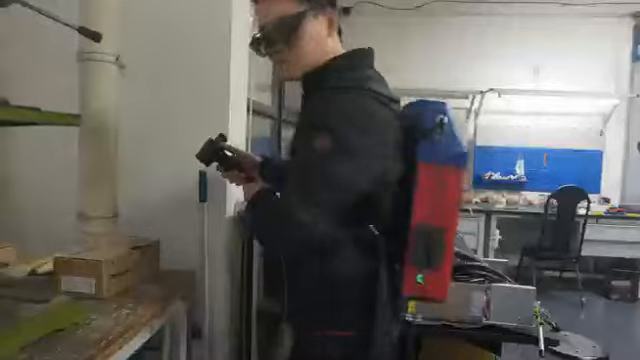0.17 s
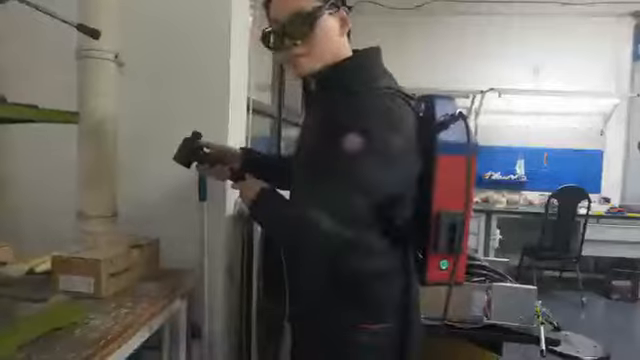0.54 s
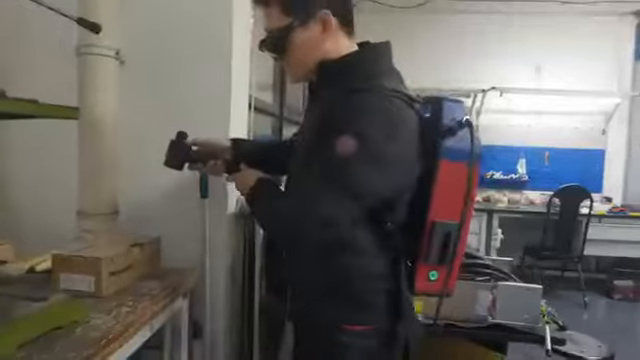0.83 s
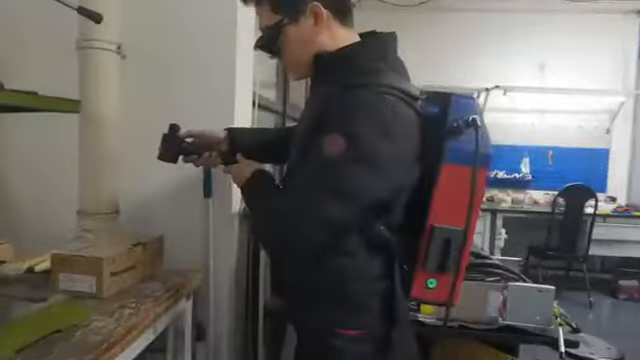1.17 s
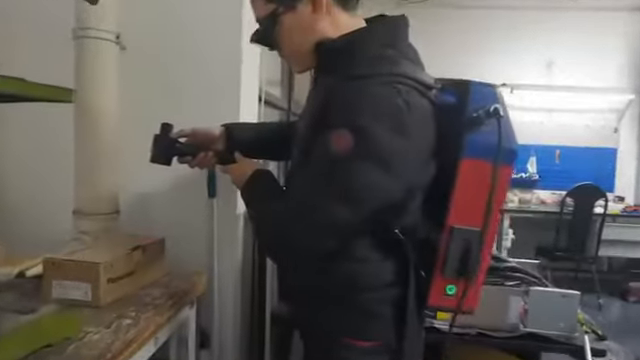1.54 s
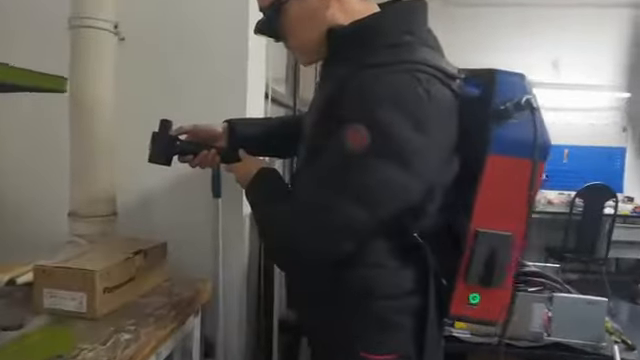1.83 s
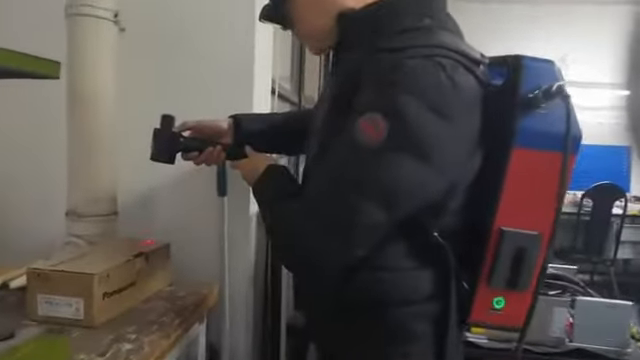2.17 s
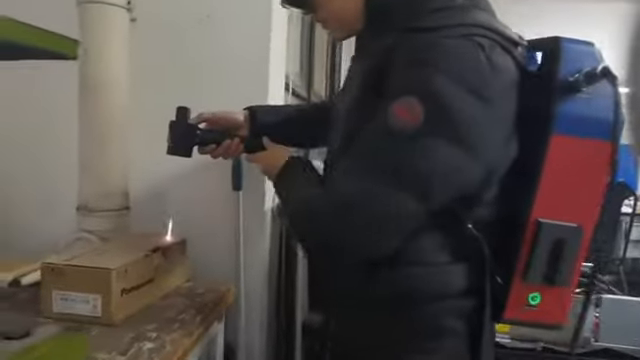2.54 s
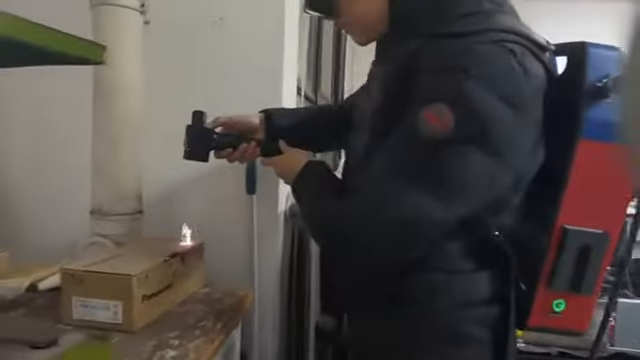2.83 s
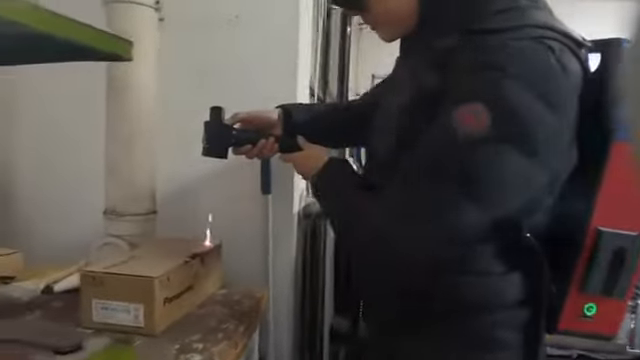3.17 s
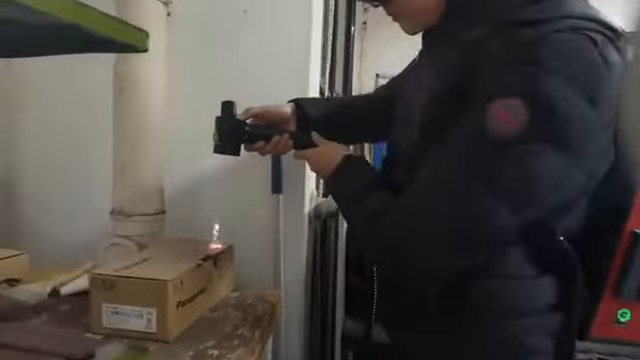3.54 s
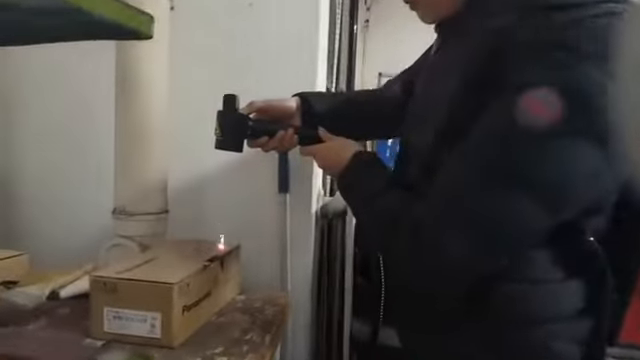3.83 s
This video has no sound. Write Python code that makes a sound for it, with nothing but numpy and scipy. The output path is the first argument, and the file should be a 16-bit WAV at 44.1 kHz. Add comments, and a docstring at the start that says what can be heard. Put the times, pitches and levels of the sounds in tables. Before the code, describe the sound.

In a workshop, cooling fans whine and hum softly while a jacket faintly rustles. Then the main sound cuts in nearby: a laser scorching cardboard in bursts of buzzing, crackling sizzle, loudest at the end.

```python
"""A backpack laser cleaner runs in a workshop. At about 0.23 s the sound comes in: cooling fans whine
and beat against each other, air throbs in the housing, and the operator's padded jacket rustles faintly.
From 2.35 s the beam sweeps back and forth over a cardboard box and burns it in thousands of tiny pops.
They blend into a harsh, buzzing sizzle that flares and fades as the hand moves."""
import sys
import numpy as np
from scipy import signal
from scipy.fft import rfft, irfft
from scipy.io import wavfile

SR = 44100
rng = np.random.default_rng(int(sys.argv[2]) if len(sys.argv) > 2 else 0)


def transcribe(signal):
    """Save signal, clipped to [-1, 1], as a 16-bit WAV file at the path in sys.argv[1]."""
    frames = np.atleast_2d(signal).T
    limited = np.clip(frames, -1, 1)
    pcm = np.round(limited * 32767).astype(np.int16)
    wavfile.write(sys.argv[1], SR, pcm)


N = 176400
T = np.arange(N) / SR
HZ = np.maximum(np.fft.rfftfreq(N, 1 / SR), 1)
BEAM_ON_S = 2.345

# how strongly the housing drones: (time [s], level [dB])
DRONE_LEVEL = [(.3, -42.5), (.6, -45), (.9, -48.5), (1.03, -38.5), (1.35, -39.5), (1.7, -44), (2.15, -43),
               (2.3, -43.5), (2.9, -51), (3.35, -43.5), (3.6, -50), (4, -52)]
# how much of the cardboard's grain the next sweep meets again: (time [s], share [0-1])
REPEAT_SHARE = [(2.6, .55), (3.05, .3), (3.35, .4), (3.95, .25)]


def from_db(db):
    """Turn decibels into a factor to multiply by."""
    return 10 ** (np.asarray(db) / 20)


def rms_one(x):
    """Scale a signal so that its average strength (rms) is 1."""
    return x / np.sqrt(np.mean(x ** 2) + 1e-20)


def over_time(table):
    """Join (time, value) points into one value per sample."""
    return np.interp(T, *np.transpose(table))


def over_hz(table):
    """Join (frequency, value) points into one value per frequency in HZ."""
    hz, value = np.transpose(table)
    return np.interp(np.log(HZ), np.log(hz), value)


def filtered(x, gain):
    """Turn each frequency up or down by its own gain."""
    return irfft(rfft(x) * gain, N)


def drift(hz, size=8192):
    """A random wobble of strength about 1, mostly slower than hz."""
    rates = np.fft.rfftfreq(size, T[-1] / size)
    slow = irfft(rfft(rng.standard_normal(size)) * (rates > 1) / (1 + (rates / hz) ** 2))
    return np.interp(T, np.linspace(0, T[-1], size), rms_one(slow))


def stereo_noise(gain):
    """Filtered noise, alike on both sides in the bass and unrelated in the treble."""
    # how alike left and right are: (frequency [Hz], likeness [0-1])
    likeness = [(60, .97), (300, .87), (600, .65), (1200, .05)]
    alike = over_hz(likeness)
    middle = filtered(rng.standard_normal(N), gain * np.sqrt(1 + alike))
    side = filtered(rng.standard_normal(N), gain * np.sqrt(1 - alike))
    return rms_one(np.array([middle + side, middle - side]))


def tone(hz, wander_hz=.96, waver_db=1.7):
    """A pure tone whose pitch and loudness wobble a little."""
    phase = 2 * np.pi * (np.cumsum(hz + wander_hz * drift(4.7)) / SR + rng.random())
    return rms_one(np.sin(phase) * from_db(waver_db * drift(11)))


def shop_rumble():
    """The workshop rumbles low in the background."""
    # tone colour of the rumble: (frequency [Hz], relative level [dB])
    colour = [(15, -18), (30, -20), (41, 10), (55, -5), (75, -19), (150, -3), (500, -83)]
    # loudness of the rumble: (time [s], level [dB])
    level = [(.3, -78), (1.4, -82), (1.9, -60.5), (2.8, -69), (3.3, -49), (4, -59)]
    return stereo_noise(from_db(over_hz(colour))) * from_db(over_time(level))


def jacket():
    """The padded jacket rustles softly as the operator turns."""
    # tone colour of the cloth: (frequency [Hz], relative level [dB])
    colour = [(500, -20), (2000, 24), (7000, -2), (15000, 5)]
    # loudness of the rustle: (time [s], level [dB])
    level = [(.25, -66), (.5, -55.5), (.68, -63), (1.15, -61.5), (1.45, -68), (2.2, -69)]
    return stereo_noise(from_db(over_hz(colour))) * from_db(over_time(level) + 2 * drift(10))


def cooling_air(housing_hz=276.2, width_hz=32, waver_db=.5):
    """Cooling air rushes through the housing and makes it throb around its own pitch."""
    # tone colour of the rush: (frequency [Hz], relative level [dB])
    colour = [(70, -5), (130, -2), (200, 1), (330, 3), (420, -5), (580, 1), (720, -9), (1000, -7.5),
              (1500, -13.5), (2300, -14), (2900, -20), (4000, -17.5), (5800, -20), (8000, -35.5),
              (15000, -43.5)]
    # loudness of the rush: (time [s], level [dB])
    level = [(.3, -47.5), (1.6, -45.5), (2.4, -46.5), (4, -45)]
    resonance = 1 / (1 + ((HZ - housing_hz ** 2 / HZ) / width_hz) ** 2)
    throb = stereo_noise(resonance) * from_db(over_time(DRONE_LEVEL) - 1.5)
    rush = stereo_noise(from_db(over_hz(colour))) * from_db(over_time(level) + waver_db * drift(8.2))
    return throb + rush


def housing_drone():
    """Low tones in the housing lie so close in pitch that together they pulse, or beat."""
    # tones of the drone: (pitch [Hz], level relative to the drone [dB])
    tones = [(271.5, -14), (279.5, -5.5), (297, -11), (311, -13)]
    return sum(tone(hz) * from_db(db) for hz, db in tones) * from_db(over_time(DRONE_LEVEL))


def housing_swells(width_s=.017):
    """The housing's drone swells softly for short moments."""
    # the swells: (time [s], peak level [dB], pitch [Hz])
    swells = [(0.352, -32, 300.4), (0.828, -35, 276), (0.981, -25.5, 270.9), (1.166, -30.5, 275),
              (1.21, -26.5, 280.7), (1.86, -29.5, 280.7), (2.031, -33, 272), (2.112, -26, 272),
              (2.17, -29, 277.5), (3.193, -33, 271.4), (3.427, -37, 276.4), (3.848, -39.5, 275)]
    return sum(from_db(db) * np.exp(-((T - s) / width_s) ** 2) * np.sin(2 * np.pi * (hz * T + rng.random()))
               for s, db, hz in swells)


def fan_tone(hz, roughness=.16):
    """One fan's tone, roughened by swirling air that differs on each side."""
    flutter = np.array([drift(28) + 1j * drift(28) for side in range(2)])
    # complex numbers let the flutter shake both loudness and phase
    return rms_one(np.real(signal.hilbert(tone(hz)) * (1 + roughness * flutter)))


def fans():
    """Three fans at nearly the same speed beat against each other; one overtone briefly sings out."""
    # the low, middle and high fan: (pitch [Hz])
    pitches = [543.5, 558.9, 586.7]
    # loudness of each fan: (time [s], level [dB])
    low = [(.3, -51.5), (1.3, -54), (2.4, -62), (4, -51)]
    middle = [(.3, -46.5), (1.2, -47.5), (1.75, -52.5), (2.4, -50), (3, -52.5), (4, -51.5)]
    high = [(.3, -48), (1.2, -52.5), (1.7, -55), (2.45, -44.5), (2.62, -39.5), (2.8, -49.5), (3.02, -37),
            (3.15, -53), (3.33, -41), (3.55, -48.5), (4, -45)]
    # weak overtones of the fans and motors: (pitch [Hz], level [dB])
    overtones = [(97, -62), (186, -64), (938, -67.5), (1675, -66), (2213, -66.5)]
    whine = sum(fan_tone(hz) * from_db(over_time(level)) for hz, level in zip(pitches, (low, middle, high)))
    faint_tones = sum(tone(hz) * from_db(db) for hz, db in overtones)
    singing = tone(2213) * from_db(-56.5) * np.exp(-((T - 2.06) / .14) ** 2)  # loudest at 2.06 s
    return whine + faint_tones + singing


def echoes(sound, places=9, close_s=.06, tail_s=.3, tail_db=-19, delay_s=.0003):
    """Quick echoes off box, bench and wall, and a short tail, change as the burning spot moves."""
    age = T[:SR // 4]
    place = np.interp(T, [BEAM_ON_S, T[-1]], [0, places - 1])
    decay = from_db(-60 * age / close_s) + from_db(tail_db - 60 * age / tail_s)
    total = 0
    for k in range(places):
        echo = rng.standard_normal((2, len(age))) * decay * (age > delay_s)
        here = sound * np.sqrt(np.maximum(1 - abs(place - k), 0))
        total = total + signal.fftconvolve(here, rms_one(echo) / np.sqrt(len(age)), axes=1)[:, :N]
    return total


def beam_pops(sweeps_per_s=218.3, pops_per_s=5900, spread_db=3, flutter_db=1.6):
    """Tiny pops along the beam's line; each sweep partly repeats the last one, which makes the buzz."""
    sizes = from_db(spread_db * np.minimum(rng.exponential(1, N), 5)) * rng.choice([-1, 1], N)
    pops = sizes * (rng.random(N) < pops_per_s / SR)
    share = over_time(REPEAT_SHARE)
    period = round(SR / sweeps_per_s)
    for i in range(period, N - period, period):
        repeated = share[i] * pops[i - period:i]
        pops[i:i + period] = repeated + np.sqrt(1 - share[i] ** 2) * pops[i:i + period]
    angle = 2 * np.pi * T * sweeps_per_s
    pulsing = 1 + .28 * np.cos(angle) + .2 * np.cos(2 * angle)  # once per sweep, and at both turns
    return pops * pulsing * from_db(flutter_db * drift(70))


def burn_strength(rise_s=.005, fall_s=.014):
    """How fiercely the cardboard burns once the beam is on: flares with sharp spurts on top."""
    # flares of the burn: (time [s], relative level [dB])
    flares = [(2.352, -73), (2.37, -45), (2.395, -41), (2.435, -34), (2.472, -40.5), (2.57, -34.5),
              (2.72, -31.5), (2.82, -37), (2.848, -33), (2.92, -39), (2.957, -34), (2.985, -30),
              (3.022, -40.5), (3.05, -29.5), (3.085, -37), (3.16, -52.5), (3.248, -46), (3.297, -49.5),
              (3.311, -39), (3.357, -34.5), (3.392, -45), (3.414, -36.5), (3.455, -36.5), (3.525, -55),
              (3.64, -52.5), (3.69, -44.5), (3.718, -31), (3.76, -31), (3.778, -45), (3.801, -32.5),
              (3.85, -33), (3.877, -41.5), (3.892, -26), (3.92, -29), (3.939, -21.5), (4.0, -26.5)]
    # sharp spurts: (time [s], relative peak level [dB])
    spurts = [(2.371, -36.5), (3.06, -33.5), (3.416, -34), (3.756, -31.5)]
    spikes = sum(from_db(db) * np.exp(-np.maximum((s - T) / rise_s, (T - s) / fall_s)) for s, db in spurts)
    return (from_db(over_time(flares)) + spikes) * from_db(2.5) * (T > BEAM_ON_S)


def sweep_ringing(pops, width_hz=34):
    """A few overtones of the sweep ring out, most while the beam retraces its line."""
    # ringing overtones: (pitch [Hz], relative level [dB])
    overtones = [(1310, -4), (3710, -7), (3932, 7), (4600, -0.5), (5265, 0), (5675, 8.5)]
    peaks = sum(from_db(db) / (1 + 1j * (HZ - hz) / width_hz) ** 2 for hz, db in overtones)
    return rms_one(filtered(pops, peaks)) * from_db(-2.3) * over_time(REPEAT_SHARE) ** 2 * burn_strength()


def flicker(sound, bands=14, depth_db=2.2):
    """Overlapping frequency bands each grow louder and softer on their own."""
    place = np.sqrt(HZ / HZ[-1]) * (bands - 1)
    return sum(filtered(sound, np.maximum(1 - abs(place - k), 0)) * from_db(depth_db * drift(22))
               for k in range(bands))


def sizzle(pops, right_delay_s=.00009, treble_hz=8000):
    """The pops of burning cardboard blend into a sizzle, heard later and mostly softer on the right."""
    # tone colour of the sizzle: (frequency [Hz], relative level [dB])
    colour = [(300, -24), (900, -13), (1400, -10.5), (2000, -14), (2450, -11.5), (2850, -9.5), (3600, -2.3),
              (4600, 0), (5700, 1.7), (7000, -3.7), (8500, -8.5), (10500, -7.6), (13000, -1), (15000, 2)]
    # how much louder the left side is: (frequency [Hz], left minus right [dB])
    balance = [(1000, 3), (2500, 8), (5000, 3), (9000, -1), (15000, 1)]
    # the top treble compared with the rest: (time [s], relative level [dB])
    treble_level = [(2.38, 1.5), (2.47, -1.5), (2.7, -1.5), (2.98, -6), (3.06, 1), (3.42, 1), (3.75, -2),
                    (3.92, -6.5), (4.0, -3.5)]
    delay = np.exp(-2j * np.pi * HZ * np.array([[0], [right_delay_s]]))
    sides = delay * from_db(over_hz(balance) * np.array([[.5], [-.5]]))
    hiss = rms_one(filtered(flicker(pops), from_db(over_hz(colour)) * sides))
    treble = filtered(hiss, 1 - 1 / (1 + (HZ / treble_hz) ** 10))
    return (hiss - treble + treble * from_db(over_time(treble_level))) * burn_strength()


def scene(echo_db=1.2, left_delay_s=.00011):
    """The burning spot and its echoes, over the machine and shop, which reach the left side later."""
    pops = beam_pops()
    spot = sizzle(pops)
    background = fans() + housing_drone() + cooling_air() + shop_rumble() + housing_swells()
    background = filtered(background, np.exp(-2j * np.pi * HZ * np.array([[left_delay_s], [0]])))
    return spot + from_db(echo_db) * echoes(spot) + sweep_ringing(pops) + background + jacket()


def record(dry):
    """The sound fades in quickly, and the very highest treble is cut."""
    start_s, fade_s, cutoff_hz = .222, .025, 15850
    faded_in = dry * np.clip((T - start_s) / fade_s, 0, 1) ** 2
    return signal.sosfilt(signal.ellip(12, .2, 80, cutoff_hz, fs=SR, output="sos"), faded_in)


dry = scene()
out = record(dry)
transcribe(out)
```